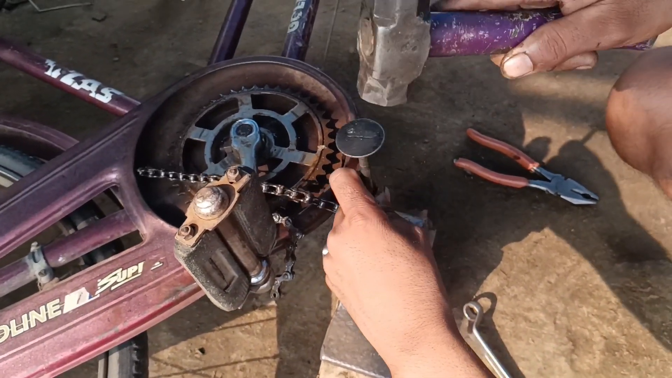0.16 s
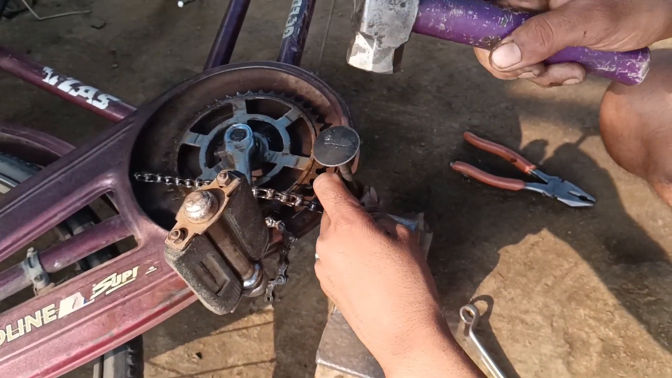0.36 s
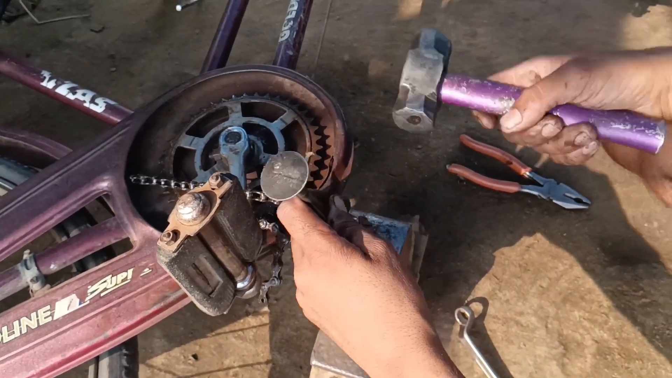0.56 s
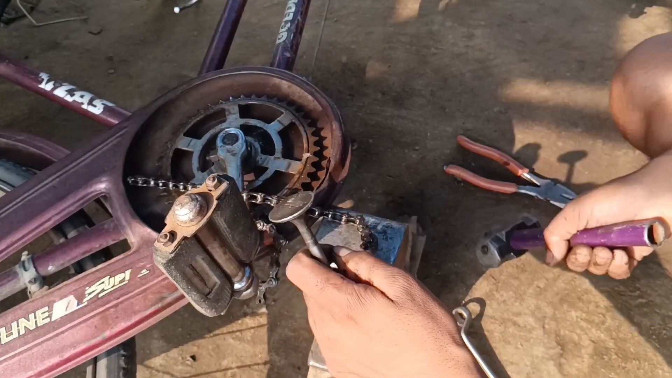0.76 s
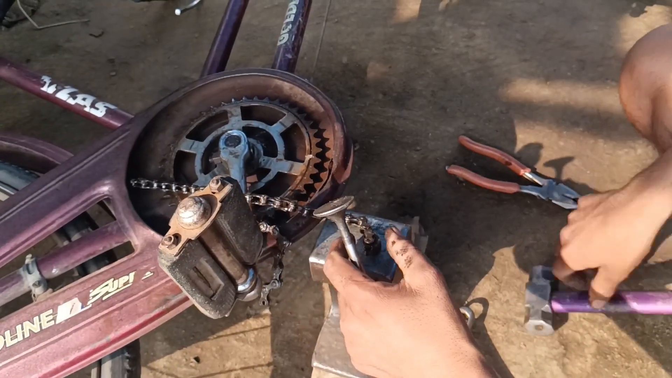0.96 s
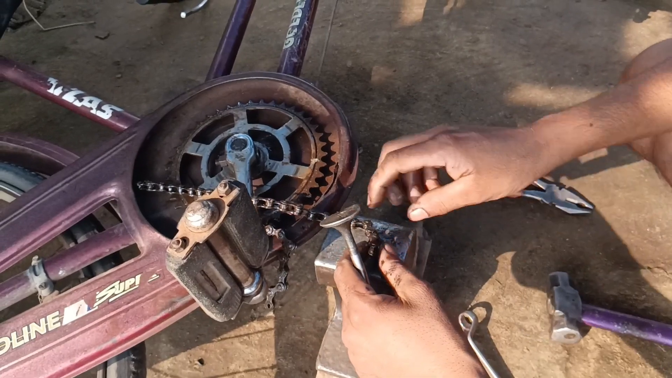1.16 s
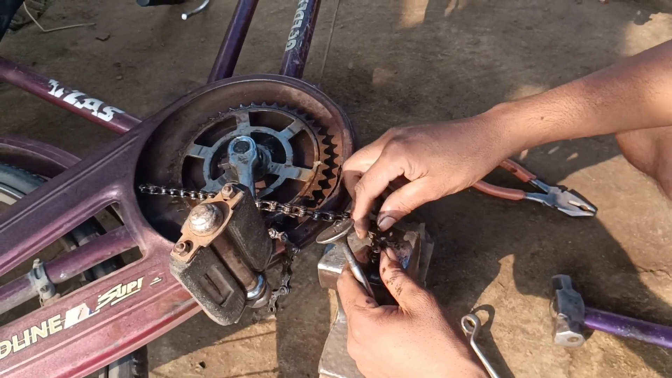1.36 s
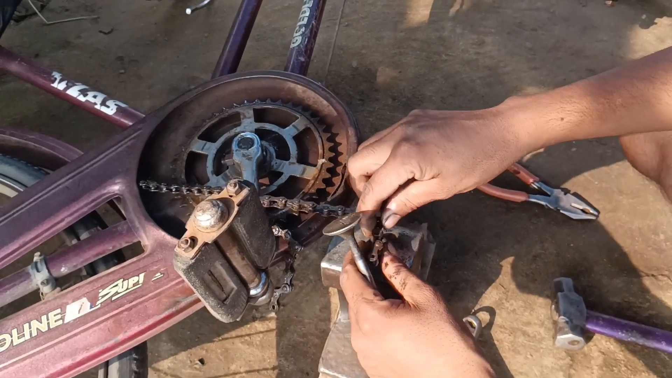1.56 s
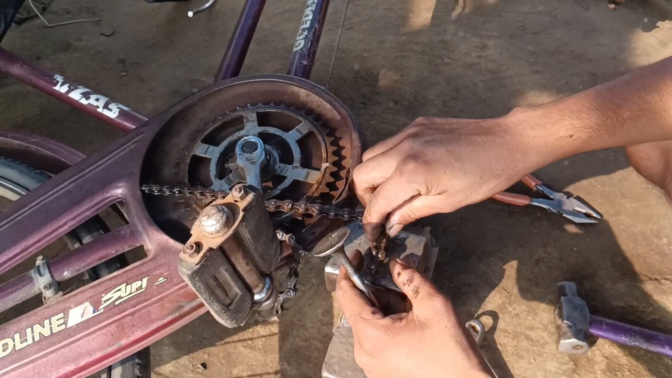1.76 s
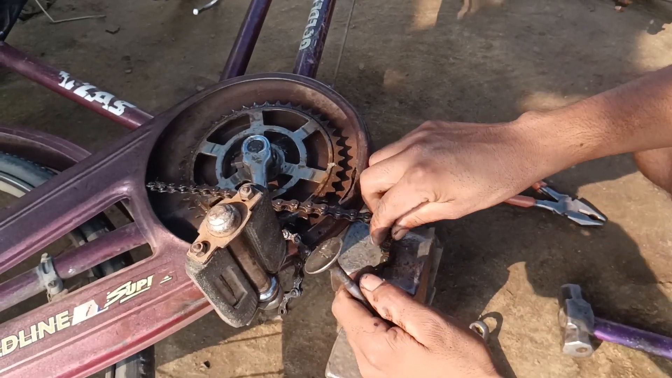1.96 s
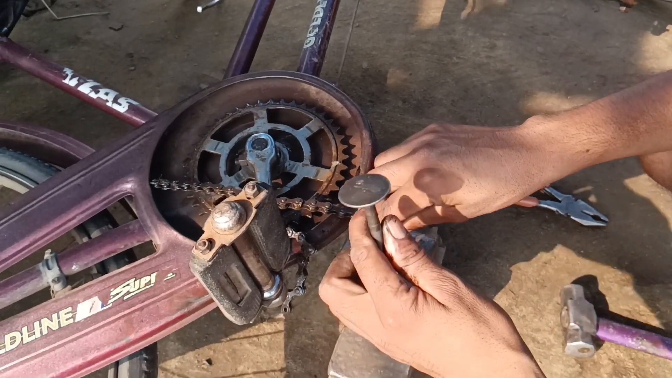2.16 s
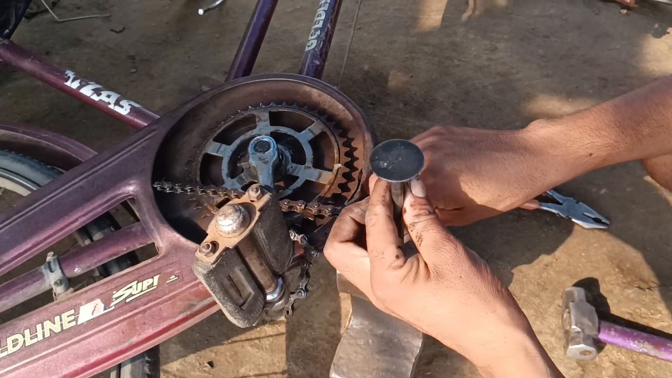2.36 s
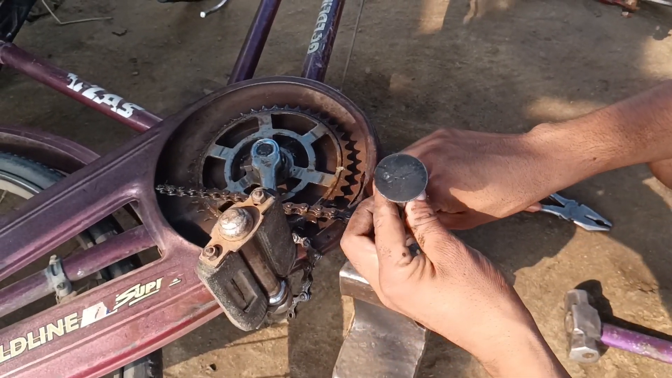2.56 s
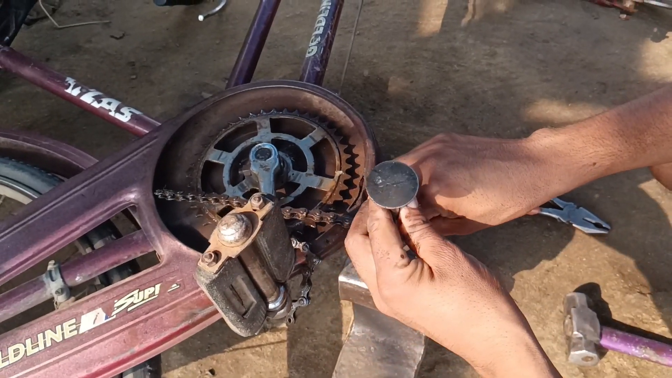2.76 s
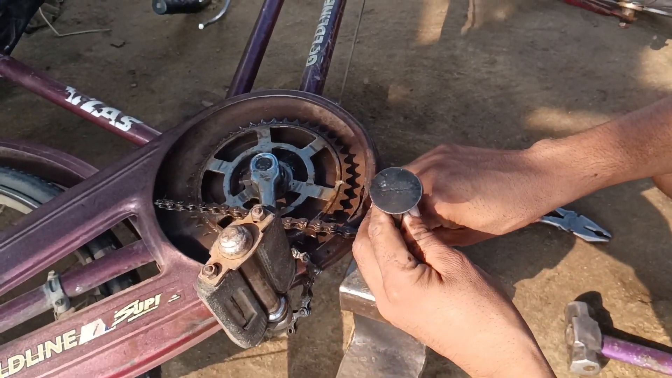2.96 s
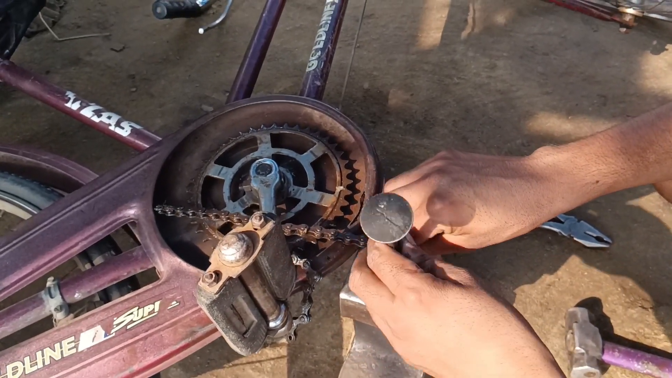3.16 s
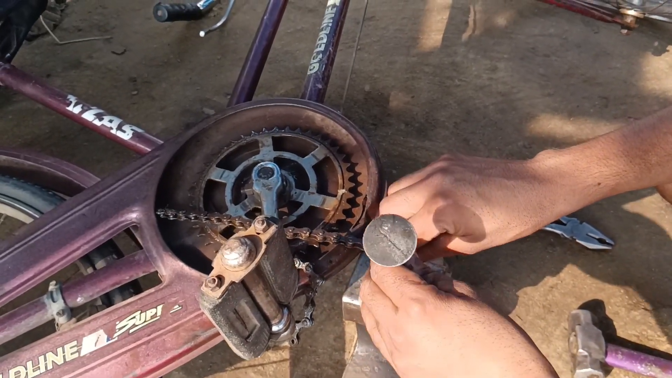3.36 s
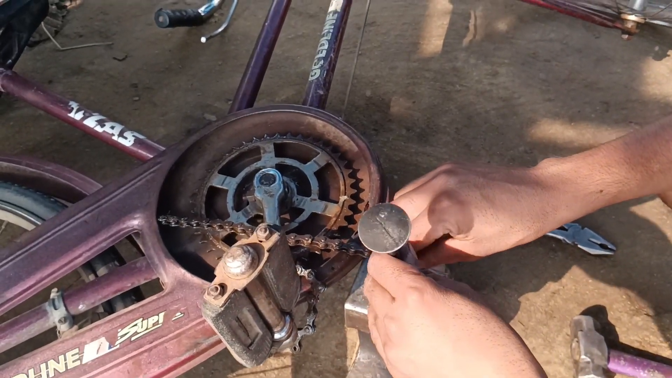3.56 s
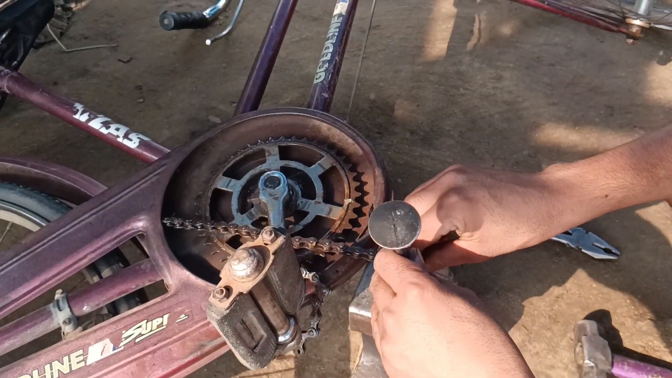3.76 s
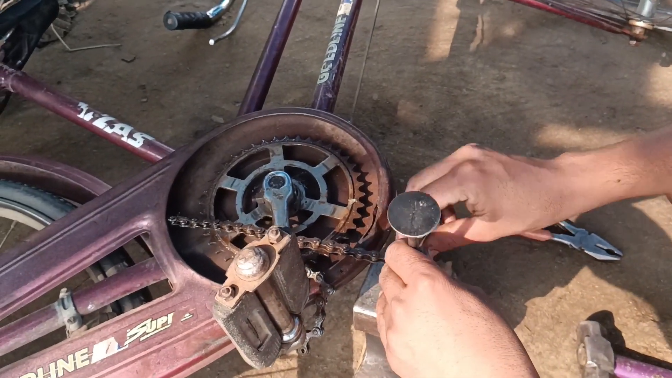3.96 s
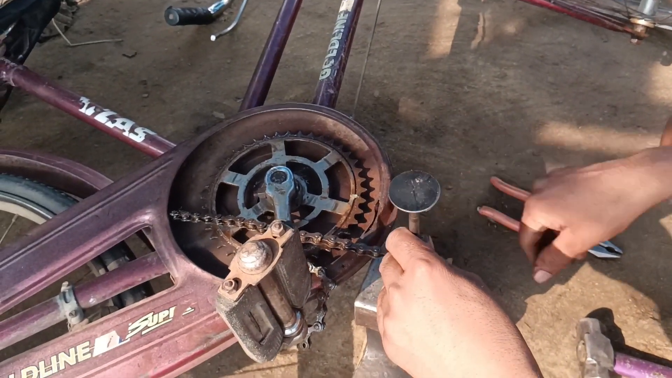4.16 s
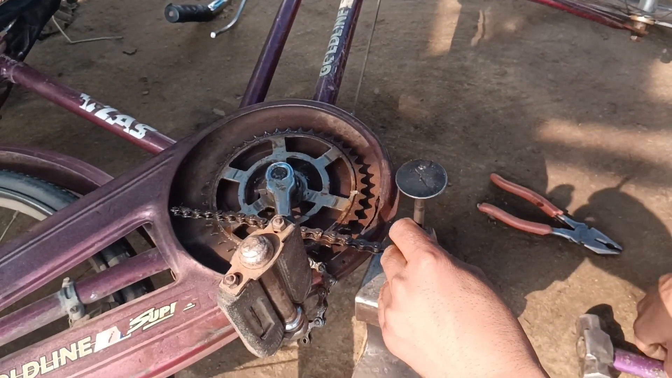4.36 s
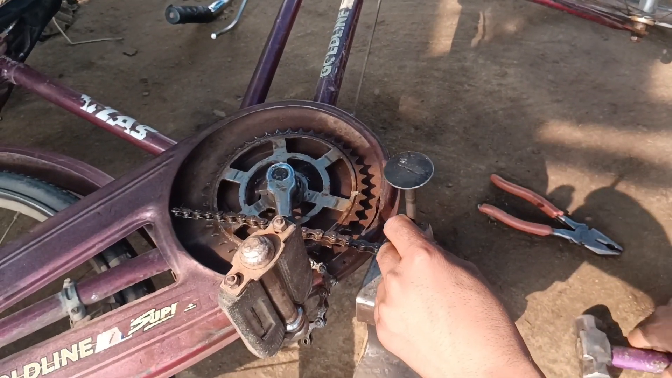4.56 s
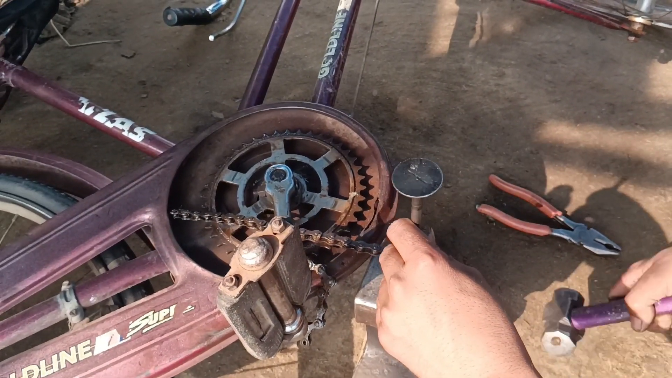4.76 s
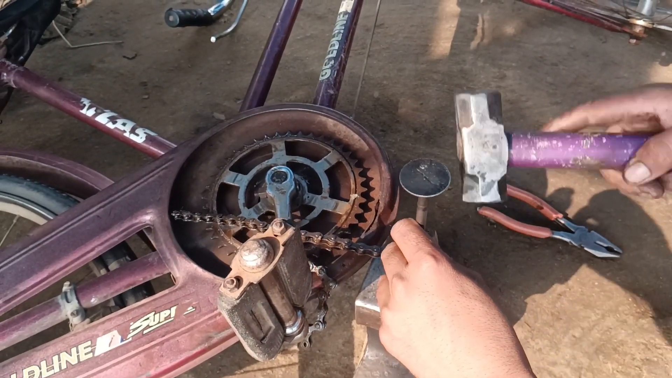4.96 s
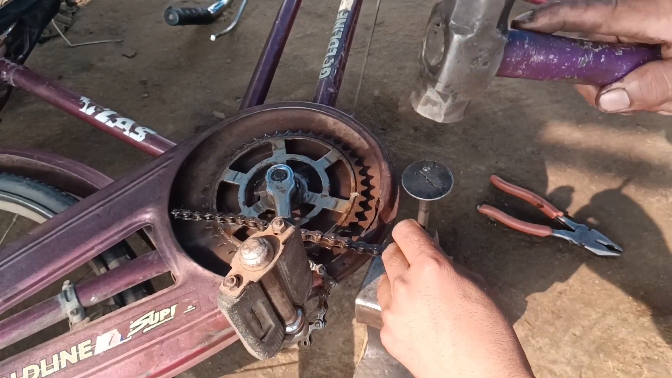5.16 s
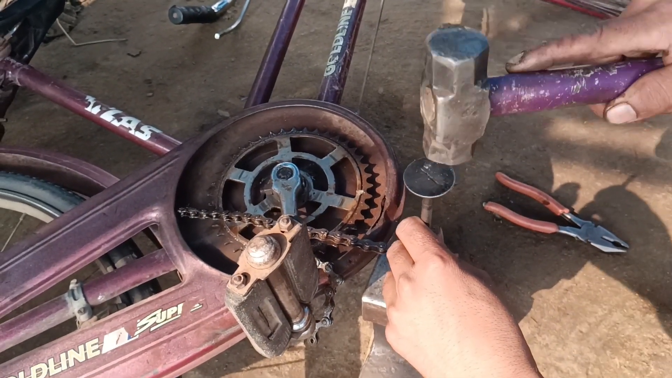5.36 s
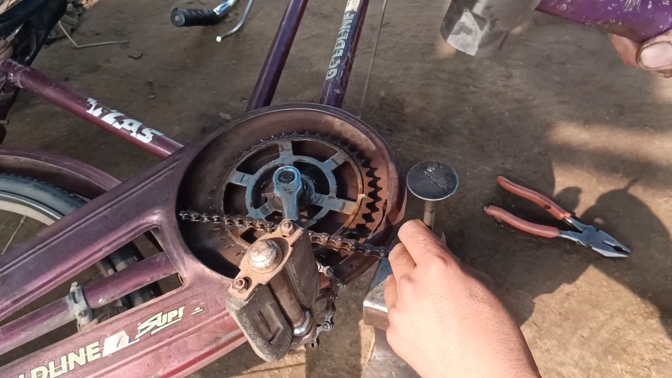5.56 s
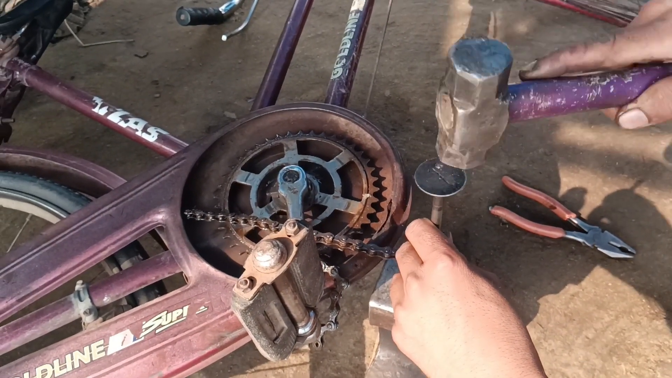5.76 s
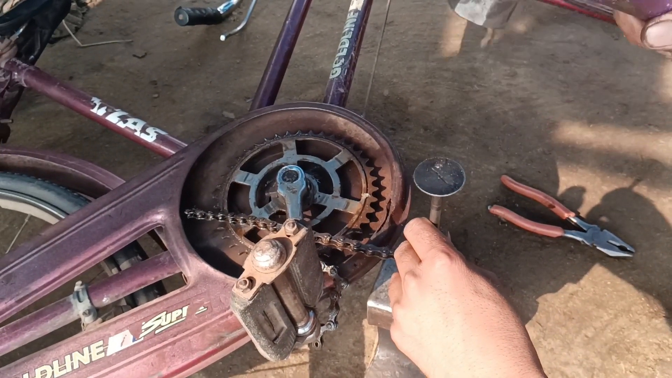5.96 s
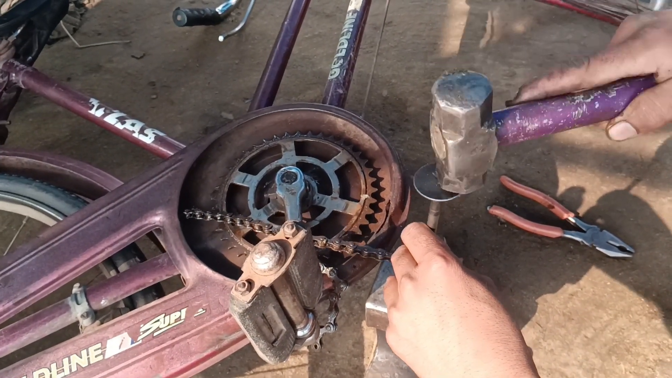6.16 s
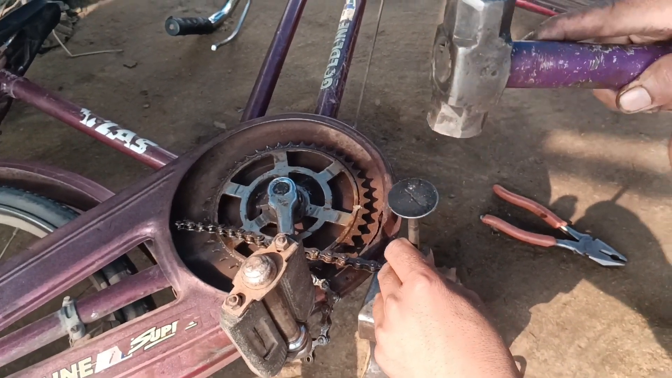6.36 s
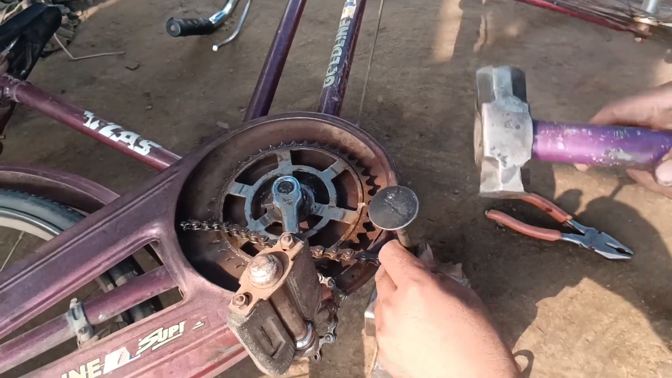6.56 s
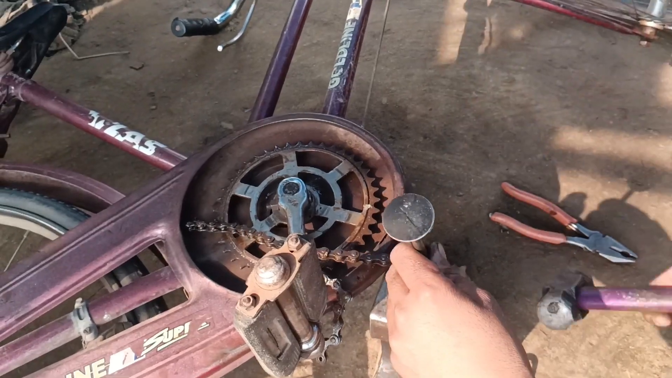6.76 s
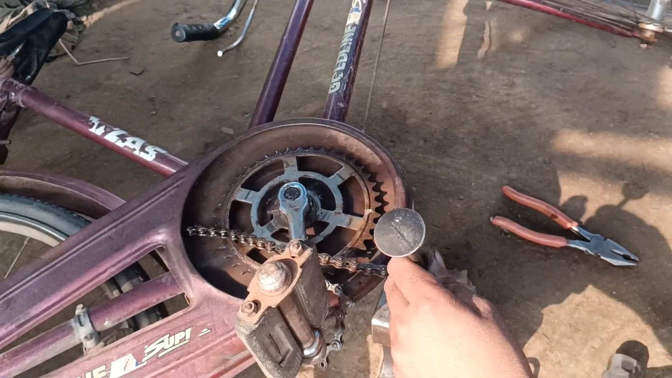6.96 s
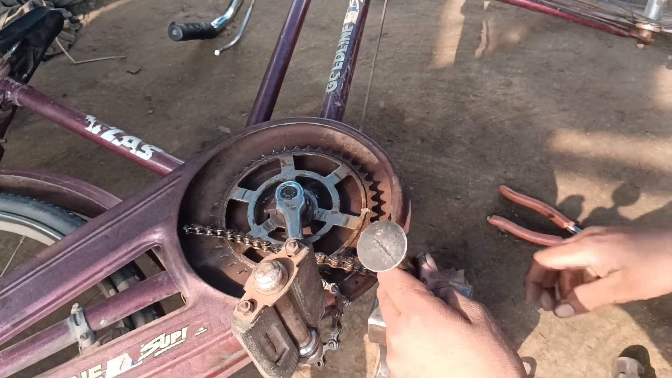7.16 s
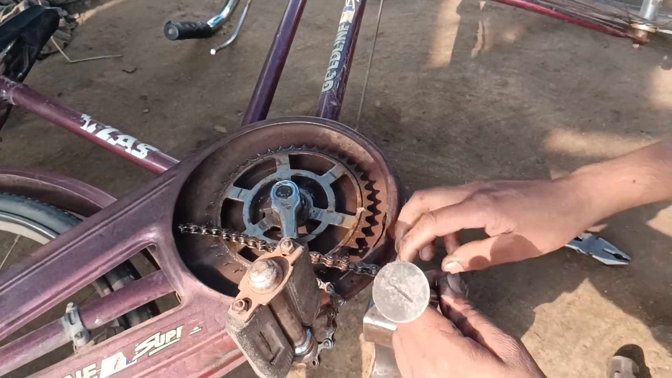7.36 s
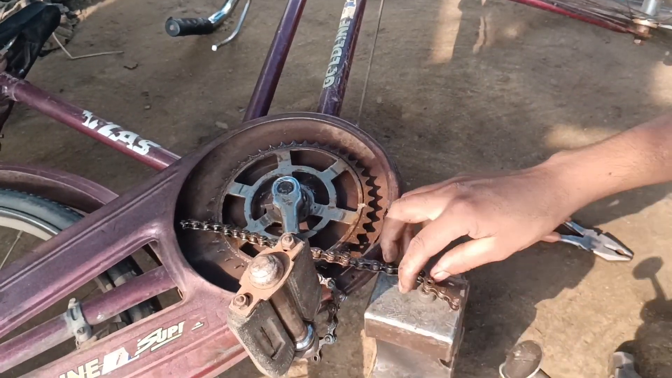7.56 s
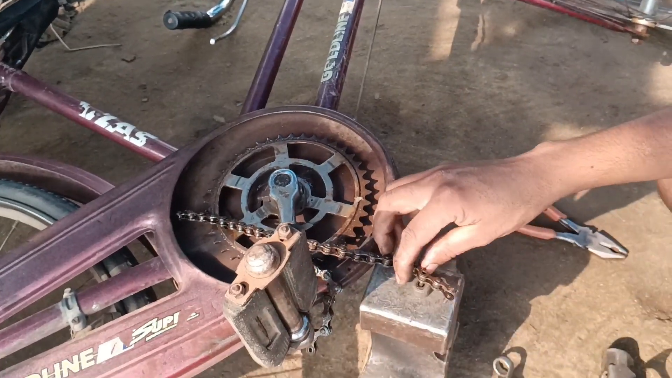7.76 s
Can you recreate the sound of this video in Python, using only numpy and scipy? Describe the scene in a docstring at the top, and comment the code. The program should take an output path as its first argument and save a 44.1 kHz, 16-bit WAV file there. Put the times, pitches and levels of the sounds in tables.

```python
"""A club hammer drives a chisel into a bicycle chain on a steel block, outdoors and close to a phone.
Each blow cracks, rattles block and chain and leaves the hammer head ringing; between blows, tools are
laid down and links scrape. Behind that a single-cylinder motorbike slowly draws near, cicadas hiss high
up, a cricket and a bird call, something ticks evenly, and a thin electric buzz lies under everything."""
import sys
import numpy as np
from scipy import signal
from scipy.fft import rfft, irfft
from scipy.io import wavfile
from scipy.ndimage import uniform_filter1d

SR = 44100
rng = np.random.default_rng(int(sys.argv[2]) if len(sys.argv) > 2 else 0)


def bounce(signal):
    """Save signal as a 16-bit WAV file at the path given by the first command-line argument."""
    frames = np.transpose(np.atleast_2d(signal))
    limited = np.clip(frames, -1, 1)
    pcm = np.round(limited * 32767).astype(np.int16)
    wavfile.write(sys.argv[1], SR, pcm)


N = 343980
T = np.arange(N) / SR

# Hammer hits: start_s, crack_db, crack_t60_s, rattle_db, settle_s, body_db, edge_db, treble_db, thud_db,
# thud_hz, ring_rise_s, ring_scale (a looser grip rings longer), then level_db for each head mode.
# Rattle, body, edge and treble are relative to the crack.
BLOWS = [(0.0381, -4.5, .01, -20, 0.037, -16, -3, -7.5, -33, 60, 0.017, 1.4, -45.5, -23, -37, -32.5, -61, -62),
         (0.069, -22, 0.024, -19.5, 0.089, -10, 9, -21, -44, 60, 0.034, 1.12, -7.5, -18, -8, -22.5, -43, -62),
         (1.833, -56, .012, -15, .04, -24, -4, -9, -74.5, 70, 0.0066, 1.19, -61, -36, -38.5, -62, -52, -76),
         (5.3534, -11.5, .014, -13, 0.074, -7, -3, -7, -20, 55, 0.038, 0.99, -19.5, -39, -57, -70, -58.5, -58),
         (5.79, -13, 0.02, -11, 0.076, -2.5, 2, -15.5, -16, 152, 0.041, 0.89, -12, -14.5, -29, -53, -65, -63),
         (6.191, -11.5, 0.038, -10, 0.11, -10.5, 0, -12, -26, 57, 0.019, 0.78, -23, -35, -16, -51, -48, -40)]
# Ring of the hammer head: pitch_hz, t60_s
HEAD_MODES = [(4115, 0.17), (5565, 0.14), (5872, 0.2), (8259, 0.15), (10065, 0.25), (10850, 0.22)]
# Clank of the chisel: pitch_hz, level_db (relative to the crack), t60_s
CHISEL_MODES = [(437, -10, .04), (714.5, -2.5, 0.036), (1400, -7.5, 0.017), (3065, -2.5, 0.021),
                (3962, -3.5, 0.015), (6730, -8, .015)]
# Colour of block, chisel and chain together: pitch_hz, width_hz, gain_db
CLATTER = [(620, 250, 3.5), (1400, 270, 5), (3100, 630, 2.5), (4000, 620, 3), (5100, 370, -4.5),
           (5830, 490, -4.5), (6890, 260, -2), (8900, 1600, 4), (10900, 1100, 3), (15000, 640, -10.5)]


def hammer():
    """Each blow rattles block and chain; the head's ring swells in just after the crack. Rows: mid, side."""
    out, t = np.zeros((2, N)), np.arange(int(.5 * SR)) / SR
    for (start, crack_db, crack_t60, rattle_db, settle, body_db, edge_db, treble_db,
         thud_db, thud_hz, ring_rise_s, ring_scale, *head_db) in BLOWS:
        crack, rattle = strike(t, crack_db, crack_t60, rattle_db, rattle_t60=.17, settle_s=settle)
        noise, side_noise = rng.standard_normal((2, len(t)))
        hit = crack + rattle
        fizz = .45 * crack + rattle  # the highest treble is mostly rattle
        bands = [(300, 1100, body_db, hit), (1700, 3980, 0, hit), (4180, 6310, edge_db, hit),
                 (6500, 12400, treble_db, fizz), (14210, 16000, treble_db - 11, fizz)]
        clatter = sum(undb(db) * excite(lambda x: band(resonate(x, CLATTER), lo, hi), noise, envelope)
                      for lo, hi, db, envelope in bands)
        # only the treble has stereo width
        side = excite(lambda x: band(resonate(x, CLATTER), 5200, 16000, passes=2), side_noise, fizz)
        # the gripped chisel rings at once and dies fast
        chisel = sum(mode(t, hz, crack_db + db + (body_db if hz < 1700 else 0), t60)
                     for hz, db, t60 in CHISEL_MODES)
        chisel *= np.minimum(t / .00081, 1)
        head = sum(mode(t, hz, db, ring_scale * t60, phase=rng.random())
                   for (hz, t60), db in zip(HEAD_MODES, head_db))
        head *= 1 - np.exp(-(t / ring_rise_s) ** 1.5)
        mid = clatter + chisel + head + thud(t, thud_db, thud_hz)
        add(out, start, np.array([mid, undb(treble_db - 3) * side]))
    return out


def strike(t, crack_db, crack_t60, rattle_db, rattle_t60, settle_s):
    """Two envelopes: a sharp crack, and a grainy rattle that stops when the loose parts settle."""
    crack = np.minimum(t / .0016, 1) ** 2 * fade(t, crack_t60)
    grains = undb(rattle_db + .56 * walk(700, size=len(t)))
    rattle = np.minimum(t / .0023, 1) * grains * fade(t, rattle_t60) / (1 + (t / settle_s) ** 6)
    return undb(crack_db) * crack, undb(crack_db) * rattle


def thud(t, db, hz):
    """The ground answers low and late; the deeper, the later."""
    rise_s = .024 * (60 / hz) ** 2
    return (1 - np.exp(-(t / rise_s) ** 2)) * mode(t, hz, db, t60=6.4 / hz)


# Tools set down on ground and block: start_s, crack_db, rattle_db, edge_hz, body_db, body_hz, thud_db,
# thud_hz, frame_db. Rattle and body are relative to the crack.
KNOCKS = [(0.97, -21, -21.5, 2740, 4, 630, -9.5, 185, -51.5),
          (1.124, -21, -24.5, 3210, 7, 740, -26.5, 200, -30),
          (1.68, -33.5, -9, 1603, -6.5, 630, -69, 120, -76),
          (6.939, -44, 5.5, 3370, 9.5, 1400, -60, 127, -66),
          (7.011, -46.5, 1, 1760, 1.5, 480, -26.5, 84, -77),
          (7.157, -22, -20.5, 2780, 8.5, 790, -37, 83.2, -49)]
# Ring of the bicycle frame: pitch_hz, level_db (relative to frame_db), t60_s
FRAME_MODES = [(345, -26.5, 0.81), (345, -37, 5.7), (990, -17.5, 0.06), (1703, -5, 0.2), (2900, -9, 0.08),
               (2900, 13.5, 0.075), (2946, 8.5, 0.12), (3105, -9, 0.29), (4410, -15.5, 0.057),
               (5014, -25.5, .05), (10600, -27, .04)]
# Bright jingle of chain links, also in the chain drag: pitch_hz, width_hz, gain_db
LINKS = [(395, 110, -9), (765, 28, -9.5), (1038, 13, -6), (1424, 100, -8.5), (1670, 54, -5), (2150, 42, -4),
         (2623, 45, -9.5), (3110, 22, -9), (3900, 16, -13), (4560, 400, -4), (4870, 57, -14)]
# Hollow colour of loose parts, also in the scrapes: pitch_hz, width_hz, gain_db
PARTS = [(505, 30, -3.5), (700.4, 20, -0.5), (888, 32, -6), (1070, 62, -3), (1544, 130, -6),
         (1797, 56, -0.5), (2380, 60, -20), (2663, 23, -11.5), (3162, 54, -19), (3812, 38, -22.5)]


def tool_knocks():
    """Duller impacts with a bright edge and a hollow body; some set the bicycle frame ringing."""
    out, t = np.zeros(N), np.arange(int(1.5 * SR)) / SR
    for start, crack_db, rattle_db, edge_hz, body_db, body_hz, thud_db, thud_hz, frame_db in KNOCKS:
        hit = sum(strike(t, crack_db, crack_t60=.011, rattle_db=rattle_db,
                         rattle_t60=.12, settle_s=.0528))
        noise = rng.standard_normal(len(t))
        edge = excite(lambda x: steep(resonate(x, LINKS) + .36 * x, edge_hz, .6 * edge_hz), noise, hit)
        body = excite(lambda x: steep(resonate(x, PARTS) + 2.3 * x, body_hz, 1.03 * body_hz), noise, hit)
        frame = sum(mode(t, hz, frame_db + db, t60) for hz, db, t60 in FRAME_MODES)
        frame *= np.minimum(t / .0045, 1)
        add(out, start, edge + undb(body_db) * body + frame + thud(t, thud_db, thud_hz))
    return out


# Short drags of links and tools: peak_s, rise_s, fall_s, level_db, centre_hz
SCRAPES = [(.085, 0.013, 0.016, -31.5, 1400), (0.096, 0.022, 0.031, -29, 3040),
           (.109, 0.0049, 0.015, -22.5, 830), (.13, 0.02, 0.034, -46, 1120),
           (0.261, 0.058, 0.059, -57, 1210), (.337, .004, 0.031, -40, 800),
           (0.371, .02, 0.015, -48.5, 2725), (1.375, 0.0063, 0.033, -51, 1400),
           (1.391, 0.0049, 0.037, -44, 1240), (1.4, 0.023, 0.021, -59.5, 3250),
           (1.451, 0.016, 0.018, -46, 1030), (1.631, 0.023, 0.055, -52, 940),
           (2.474, .004, 0.0045, -58.5, 1750), (6.95, 0.0068, 0.024, -46.5, 3650),
           (7.23, .037, .03, -58, 2500), (7.338, 0.022, 0.041, -58.5, 1130)]


def scrapes():
    """Friction grains ring the dragged parts."""
    return swells(SCRAPES, lambda x: resonate(x, PARTS) + .21 * x, width_share=1.1, grain_db=2)


# Swell of the closing chain drag: time_s, level_db
DRAG = [(7.44, -59), (7.55, -58), (7.58, -50.5), (7.7, -49), (7.73, -46.5), (7.8, -45)]


def chain_drag():
    """The chain is drawn off the block, each link resonance flickering on its own."""
    (db,), active = curve(DRAG)
    jingle = sum(undb(2 * walk(35)) * resonate(rng.standard_normal(N), [(hz, width, gain)])
                 * np.sqrt(100 / width) for hz, width, gain in LINKS)
    return uniform_filter1d(active * undb(db), size=800) * unit(steep(jingle, 2790, 5300))


# Dull low thumps, many trailing a blow or knock: peak_s, fall_s, level_db, centre_hz
THUMPS = [(0.131, 0.041, -56, 70.5), (.4, .04, -61.5, 58.3), (0.999, 0.013, -40, 150),
          (1.198, 0.072, -71, 320), (1.37, .08, -58, 78), (5.66, 0.064, -57, 60),
          (5.819, 0.025, -46.5, 300), (5.84, 0.036, -44.5, 60.7), (6.381, 0.028, -55.5, 70.3),
          (7.15, 0.038, -49.5, 70.5)]


def thumps():
    """Short, grainy swells of low noise."""
    events = [(peak, .9 * fall, fall, db, hz) for peak, fall, db, hz in THUMPS]
    return swells(events, lambda x: x, width_share=1, grain_db=4)


# Thin squeaks and tings: peak_s, fall_s, level_db, pitch_hz, blur_hz
METAL_TONES = [(.255, 0.019, -57, 4800, 502), (.5, .08, -67.5, 1850, 199), (.75, 0.066, -67, 1580, 90.7),
               (1.06, 0.1, -69.5, 1630, 30), (1.64, 0.044, -65, 2440, 201),
               (1.683, 0.0076, -38.5, 1650, 250.2), (1.77, 0.025, -63.5, 1726, 40),
               (6.948, .02, -43, 1620, 200), (7.17, 0.0065, -53, 718, 58.3),
               (7.2, 0.028, -57.5, 1620, 60.5), (7.22, 0.028, -64, 5300, 900),
               (7.315, 0.03, -52, 2310, 219), (7.575, 0.035, -53, 2140, 69.4), (7.66, 0.049, -58, 3900, 99),
               (7.68, 0.041, -58.5, 1580, 59.4), (7.735, 0.026, -47, 2116, 80)]


def metal_tones():
    """Rubbed or jolted metal sings briefly on one blurred pitch."""
    lead_s = .12
    out, t = np.zeros(N), np.arange(-lead_s, .3, 1 / SR)
    for peak, fall, db, hz, blur_hz in METAL_TONES:
        swell = undb(db) * np.exp(-np.where(t < 0, t / (.68 * fall), t / fall) ** 2)
        add(out, peak - lead_s, swell * waver(np.full(len(t), hz), blur_hz, clean=.43))
    return out


# Engine pace: time_s, firing_hz
FIRING = [(0.0, 22.83), (0.91, 22.93), (1.65, 23.4), (2.3, 23.29), (2.91, 23.95), (4.25, 24.58),
          (5.19, 25.27), (5.47, 25.64), (6.21, 26.2), (6.8, 26.23), (7.1, 25), (7.28, 26.5), (7.8, 25.7)]
# Boom of the exhaust pipe: pitch_hz, width_hz, gain_db
EXHAUST = [(95, 120, 2), (150, 35, 14), (290, 77, -29)]
# Whirr of gears and valves: pitch_hz, width_hz, gain_db
GEARS = [(502.4, 118, -0.5), (1006, 49.4, -4), (1380, 72, -14), (2000, 85, -7), (2690, 44, -8.5),
         (3116, 100, -6), (3870, 720, -12.5)]


def motorbike():
    """One firing a cycle rings the exhaust and pushes the gear whirr, which gains as the bike nears."""
    start_m, speed_m_s = 98.3, 10.46
    exhaust_db, gear_db, gear_loss_db_per_m = -25.5, -23, .31  # levels before distance losses
    metres = start_m - speed_m_s * T
    (firing_hz,), _ = curve(FIRING)
    cycles = np.cumsum(firing_hz * (1 + .0068 * walk(54))) / SR
    firings = np.diff(np.floor(cycles), prepend=0) * undb(walk(25))
    exhaust = undb(exhaust_db) * unit(band(resonate(firings, EXHAUST), 52, 430))
    push = .9 + np.exp(-(cycles % 1) / .9)
    whirr = sum(undb(2.5 * walk(10)) * resonate(rng.standard_normal(N) * push, [(hz, width, gain)])
                * np.sqrt(50 / width) for hz, width, gain in GEARS)
    gears = undb(gear_db - gear_loss_db_per_m * metres) * unit(steep(whirr, 2600, 6200))
    return (exhaust + gears) / metres


# Whine of the approaching bike: time_s, lower_hz, lower_db, upper_db
WHINE = [(4.9, 1075, -79.5, -77.5), (5.55, 1075, -68, -76), (6.2, 1075, -73.5, -66.5),
         (6.45, 1035, -68.5, -64), (6.8, 1017, -60, -69), (6.95, 1020, -75, -81), (7.4, 1022, -71, -91)]


def motorbike_whine():
    """Two wavering whines, about an octave apart, come with the motorbike."""
    (lower_hz, lower_db, upper_db), active = curve(WHINE)
    upper_hz = np.full(N, 2040)
    whine = sum(undb(db + 3 * walk(16)) * waver(hz, blur_hz=120, clean=0)
                for hz, db in ((lower_hz, lower_db), (upper_hz, upper_db)))
    return uniform_filter1d(1. * active, size=4000) * whine


# Level ride of the cicada chorus: time_s, level_db
CICADA_LEVEL = [(0.0, -53.5), (0.87, -52), (1.78, -54), (2.5, -53), (2.67, -55.5), (3.54, -56), (4.23, -52),
                (4.54, -55), (7.8, -58)]
# Colour of its hiss: frequency_hz, relative_db
CICADA_SPECTRUM = [(3240, -61), (5500, -76.5), (5890, -12.5), (6170, -6.5), (6740, 4), (7170, 4.5),
                   (7970, -0.5), (8520, -6), (9180, -14), (9500, -22.5), (11500, -36), (15000, -45),
                   (22000, -120)]


def cicadas():
    """Dense clicks merge into a high hiss; near the end one cicada stands out as a shrill line."""
    (db,), _ = curve(CICADA_LEVEL)
    chorus = undb(db + .4 * walk(400) + .56 * walk(12)) * coloured(CICADA_SPECTRUM)
    solo_level = gate([(6, 8)], ramp_samples=6000) * undb(-70.5 + 3.4 * walk(10))
    return chorus + solo_level * waver(np.full(N, 6235.5), blur_hz=60, clean=.19)


# Bouts of cricket song: start_s, end_s
CRICKET_BOUTS = [(1.4, 2.72), (3.12, 3.5)]
# Accents on its lower line: peak_s, half_length_s, level_db
CHIRPS = [(1.472, .015, -70), (1.836, 0.021, -76), (2.03, 0.06, -74), (2.2, .03, -74), (2.432, 0.037, -62),
          (2.652, 0.016, -69), (3.25, 0.052, -67)]


def cricket():
    """Two narrow bands throb in bouts; the lower one swells into chirps."""
    bouts = gate(CRICKET_BOUTS, ramp_samples=2000)
    chirps = sum(undb(db) * np.exp(-((T - peak) / half) ** 2) for peak, half, db in CHIRPS)
    out = np.zeros(N)
    for hz, width_hz, db, accents in ((3118, 57, -73.5, chirps), (3450, 93, -78.5, 0)):
        level = bouts * undb(db + 2.5 * walk(30)) + accents
        out += level * unit(band(rng.standard_normal(N), hz - width_hz / 2, hz + width_hz / 2))
    return out


def bird(start_s=1.69, length_s=.17, from_hz=1790, to_hz=2240):
    """One whistle that fades as it rises."""
    out = np.zeros(N)
    progress = np.arange(int(length_s * SR)) / (length_s * SR)
    glide_hz = from_hz + (to_hz - from_hz) * (1 - (1 - progress) ** 2)
    envelope = undb(-62 - 11 * progress) * np.sin(np.pi * progress) ** .2
    add(out, start_s, envelope * waver(glide_hz, blur_hz=70, clean=1))
    return out


def ticks(first_s=.3962, every_s=1.5099, length_s=.0039, pulse_hz=1326):
    """A faint tick of five pulses returns at an even pace."""
    out, t = np.zeros(N), np.arange(int(length_s * SR)) / SR
    pulses = sum(gain * np.cos(2 * np.pi * order * pulse_hz * t)
                 for order, gain in enumerate((.51, .58, .26, .043), start=1))
    tick = -undb(-43.5) * pulses * np.sin(np.pi * t / length_s) ** .32
    for start in np.arange(first_s, N / SR, every_s):
        add(out, start, tick)
    return out


# Harmonics that stick out of the buzz: harmonic_number, level_db
BUZZ_PEAKS = [(22, -82.5), (30, -85.5), (43, -75.5), (82, -84.5)]


def electric_buzz(fundamental_hz=60.27):
    """A thin comb of steady upper harmonics, with a fainter patch at the very top."""
    orders = np.r_[18:100, 236:262]
    db = np.where(orders < 100, -95, -104) + 5.5 * rng.standard_normal(len(orders))
    for order, peak_db in BUZZ_PEAKS:
        db[orders == order] = peak_db
    spectrum = np.zeros(N // 2 + 1, complex)
    bins = np.round(orders * fundamental_hz * N / SR).astype(int)
    spectrum[bins] = undb(db) * np.exp(2j * np.pi * rng.random(len(orders)))
    return irfft(spectrum, N) * N / np.sqrt(2)


# Colour of the outdoor bed: frequency_hz, relative_db
AIR_SPECTRUM = [(15, -22.5), (40, -9), (80, -1), (150, -3), (230, -13.5), (320, -9.5), (420, -19.5),
                (850, -20.5), (960, -17.5), (1200, -23.5), (2500, -21.5), (3500, -27.5), (5600, -25.5),
                (7300, -56.5), (12000, -120)]


def air():
    """A low, gently drifting outdoor rumble with a faint steady fizz on top."""
    rumble = undb(-64.5 + 1.4 * walk(3.13)) * coloured(AIR_SPECTRUM)
    fizz = undb(-96) * unit(band(rng.standard_normal(N), 14200, 15900, passes=2))
    return rumble + fizz


def swells(table, body, width_share, grain_db):
    """Short swells of uneven grains excite a body; bandwidth is a share of the centre frequency."""
    lead_s = .08
    out, t = np.zeros(N), np.arange(-lead_s, .3, 1 / SR)
    for peak, rise, fall, db, hz in table:
        grains = undb(db + grain_db * walk(250, size=len(t)))
        swell = grains * np.exp(-np.where(t < 0, (t / rise) ** 2, np.abs(t / fall) ** 1.6))
        noise = rng.standard_normal(len(t))
        add(out, peak - lead_s, excite(lambda x: steep(body(x), hz, width_share * hz), noise, swell))
    return out


def waver(hz, blur_hz, clean):
    """A line smeared into a narrow band around its pitch; clean is the amplitude of pure tone in it."""
    size = len(hz)
    smear = clean + walk(blur_hz, size=2 * size)[:size] + 1j * walk(blur_hz, size=2 * size)[:size]
    return np.real(smear * np.exp(2j * np.pi * np.cumsum(hz) / SR))


def excite(body, noise, envelope):
    """Shaped noise through a filter, scaled so that steady noise would come out at rms 1."""
    return body(noise * envelope) / np.std(body(noise))


def resonate(x, peaks):
    """Sum of resonances (pitch_hz, width_hz, gain_db) with alternating sign."""
    return sum((-1) ** k * undb(db) * signal.lfilter(*signal.iirpeak(hz, hz / width, SR), x)
               for k, (hz, width, db) in enumerate(peaks))


def band(x, lo_hz, hi_hz, passes=1):
    sos = signal.butter(2, [lo_hz, min(hi_hz, .45 * SR)], "bandpass", fs=SR, output="sos")
    return signal.sosfilt(np.tile(sos, (passes, 1)), x)


def steep(x, hz, width_hz):
    """Two band-passes in series, gentler on the low side."""
    lo_hz, hi_hz = max(hz - width_hz / 2, 20), hz + width_hz / 2
    return band(band(x, lo_hz, hi_hz), .58 * lo_hz, hi_hz)


def coloured(spectrum):
    """Noise of rms 1 shaped by (frequency_hz, relative_db) points."""
    hz, db = np.transpose(spectrum)
    log_hz = np.log(np.arange(N // 2 + 1) * SR / N + 1)
    gain = undb(np.interp(log_hz, np.log(hz), db))
    return unit(irfft(rfft(rng.standard_normal(N)) * gain, N))


def walk(rate_hz, size=N):
    """Random levels joined by ramps; spread near 1."""
    hold = max(int(SR / rate_hz), 1)
    steps = np.repeat(rng.standard_normal(size // hold + 1), hold)
    return 1.7 * uniform_filter1d(steps, hold)[:size]


def curve(table):
    """Each column interpolated over time, and a mask of the span the table covers."""
    times, *columns = np.transpose(table)
    return [np.interp(T, times, column) for column in columns], (T > times[0]) & (T < times[-1])


def gate(spans, ramp_samples):
    """Opens softly for each (start_s, end_s)."""
    return uniform_filter1d(sum(1. * (T > start) * (T < end) for start, end in spans), ramp_samples)


def mode(t, hz, db, t60, phase=0):
    """A decaying sine; phase is in cycles."""
    return undb(db) * fade(t, t60) * np.sin(2 * np.pi * (hz * t + phase))


def fade(t, t60):
    return np.exp(-np.log(1000) * t / t60)


def undb(db):
    return 10 ** (np.asarray(db) / 20)


def unit(x):
    return x / np.sqrt(np.mean(x ** 2))


def add(out, start_s, x):
    i = int(start_s * SR)
    out[..., i:i + x.shape[-1]] += x[..., :N - i]


def scene():
    """Left and right: everything sits in the centre except the hammer's treble."""
    blows, side = hammer()
    close_sounds = tool_knocks() + scrapes() + thumps() + chain_drag() + metal_tones()
    traffic = motorbike() + motorbike_whine()
    wildlife = cicadas() + cricket() + bird()
    mid = blows + close_sounds + traffic + wildlife + ticks() + electric_buzz() + air()
    return np.array([mid + side, mid - side])


def record(dry):
    """The phone drops the deepest bass and cuts the top steeply."""
    dry = signal.sosfilt(signal.butter(2, 42, "highpass", fs=SR, output="sos"), dry)
    return signal.sosfilt(signal.ellip(10, .2, 70, 15900, fs=SR, output="sos"), dry)


dry = scene()
out = record(dry)
bounce(out)
```